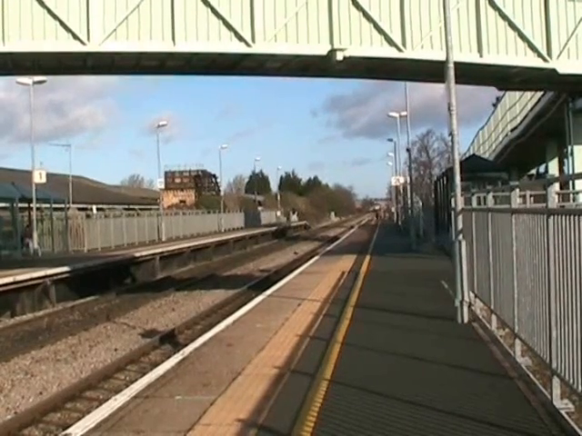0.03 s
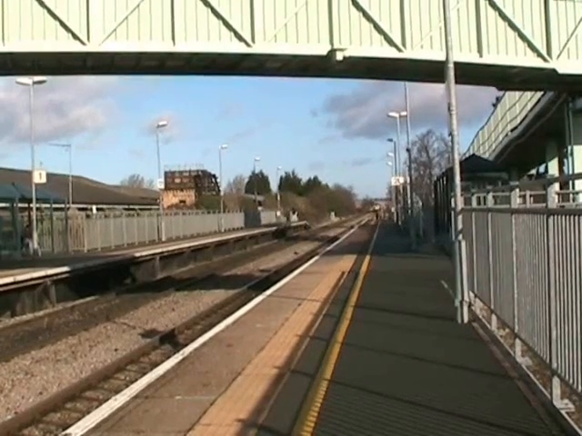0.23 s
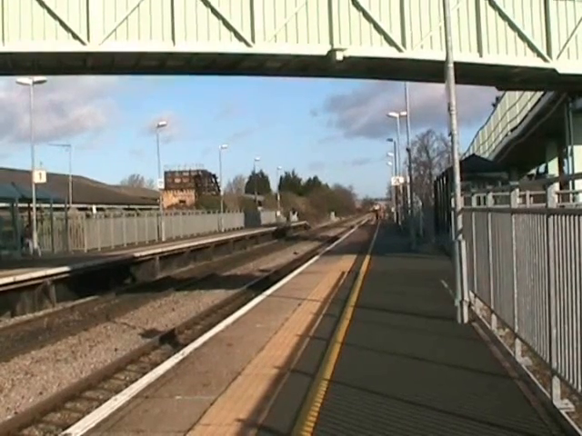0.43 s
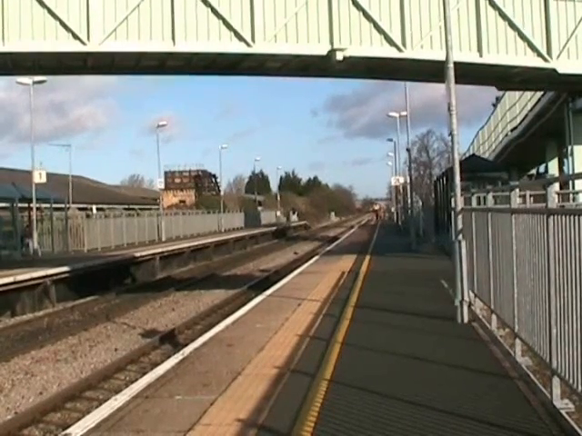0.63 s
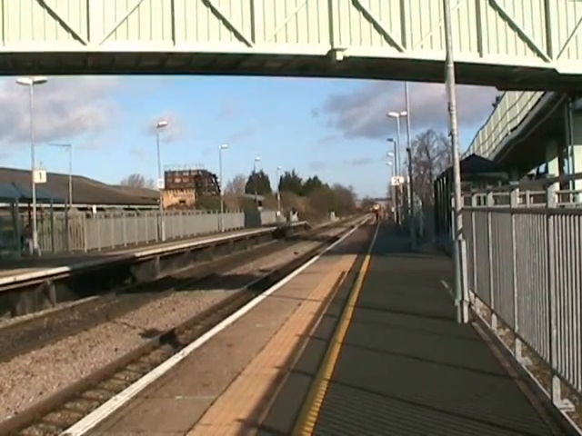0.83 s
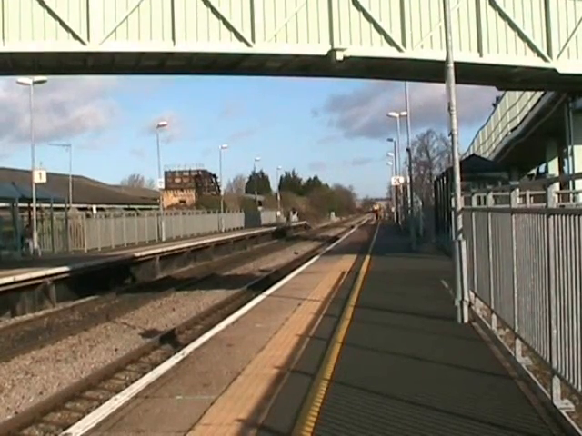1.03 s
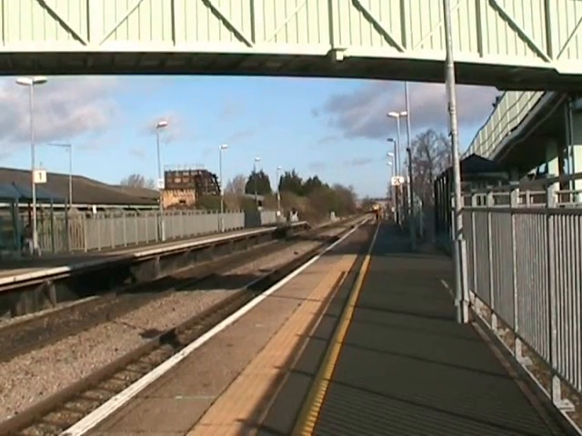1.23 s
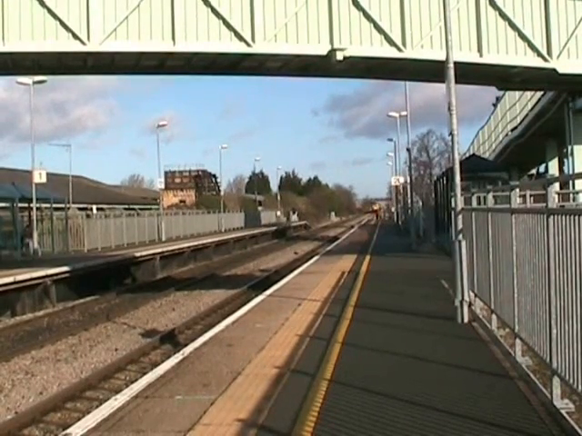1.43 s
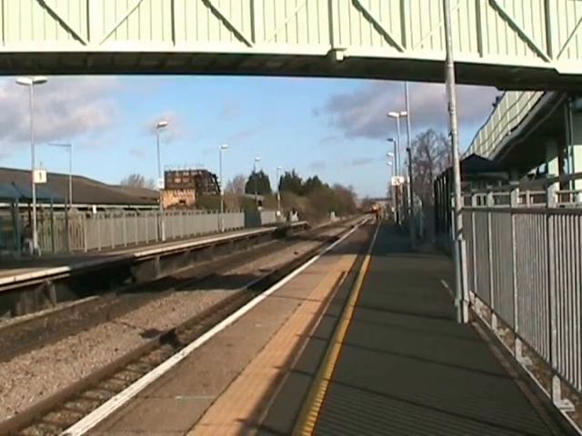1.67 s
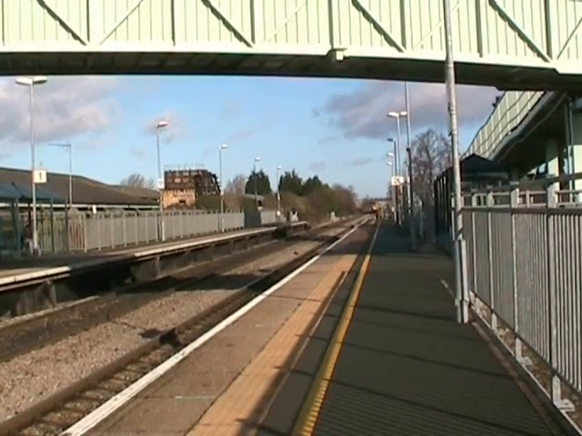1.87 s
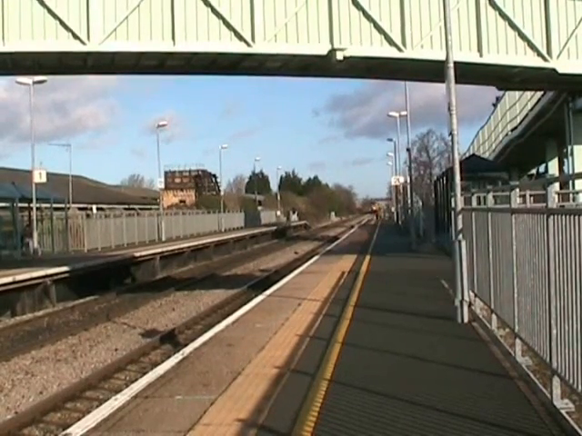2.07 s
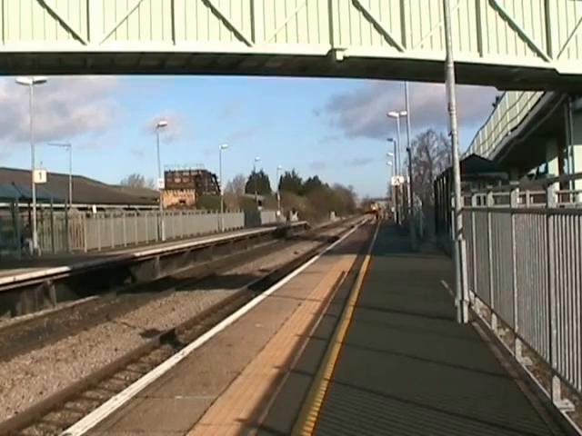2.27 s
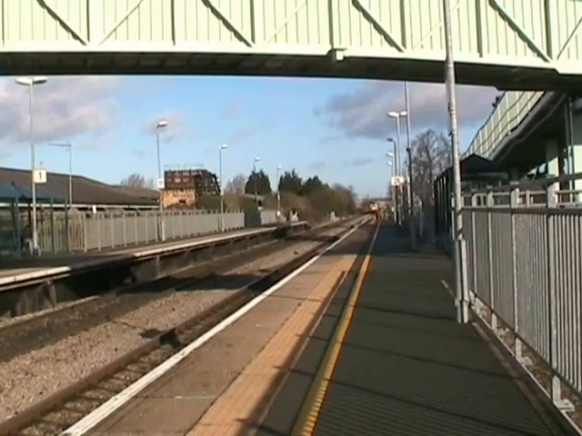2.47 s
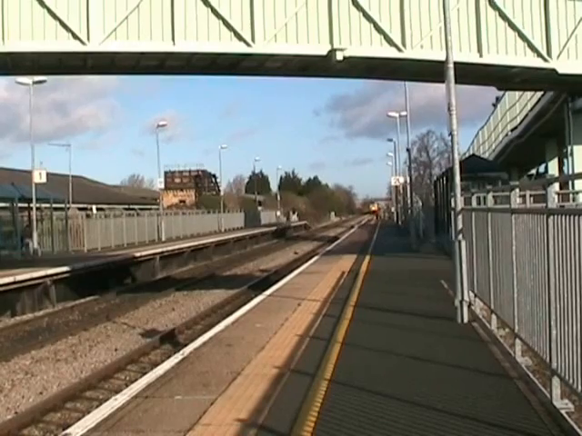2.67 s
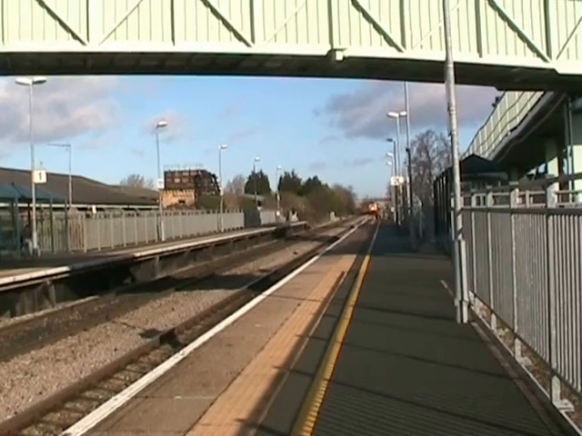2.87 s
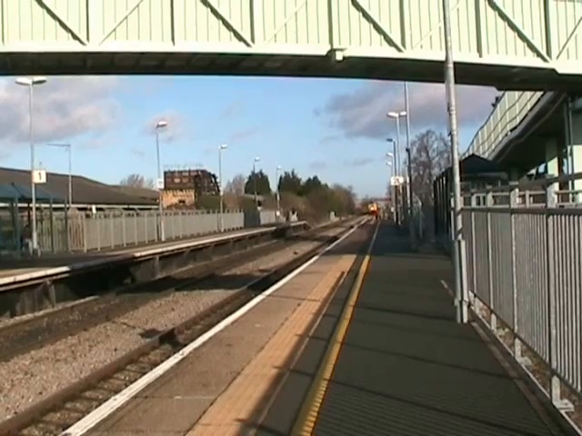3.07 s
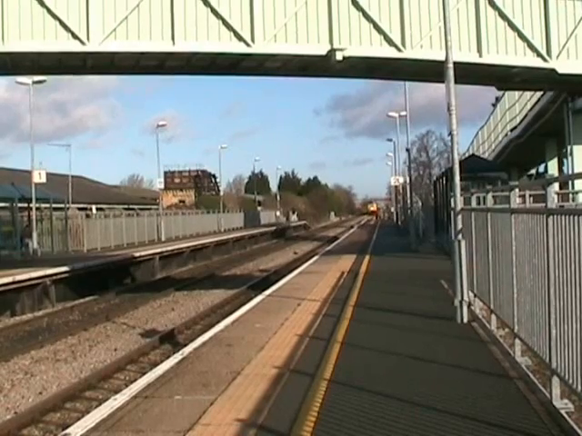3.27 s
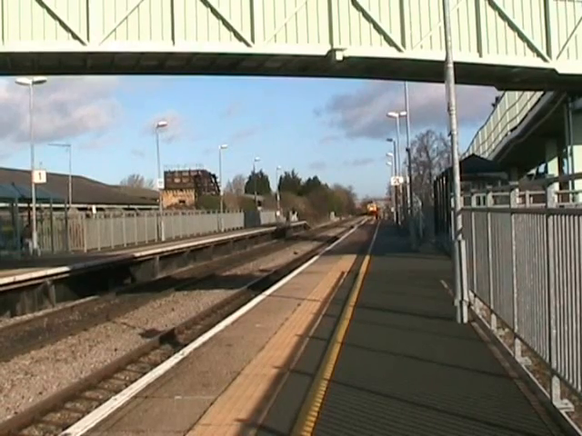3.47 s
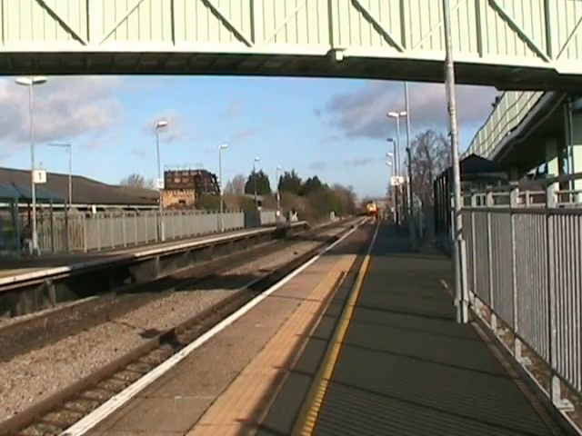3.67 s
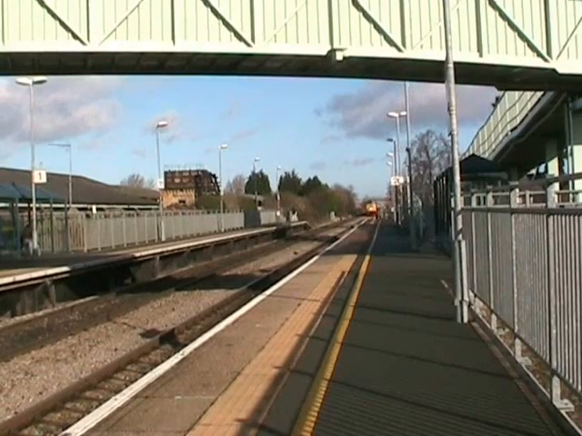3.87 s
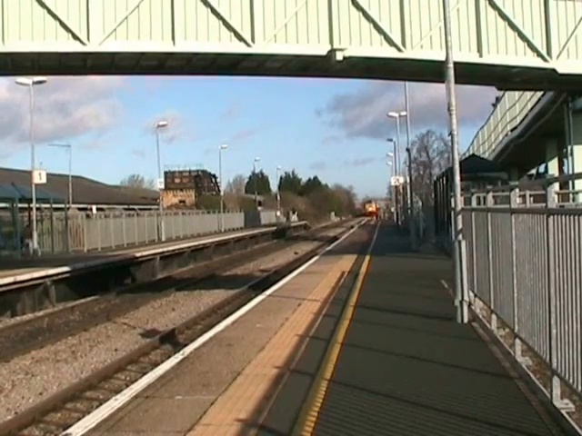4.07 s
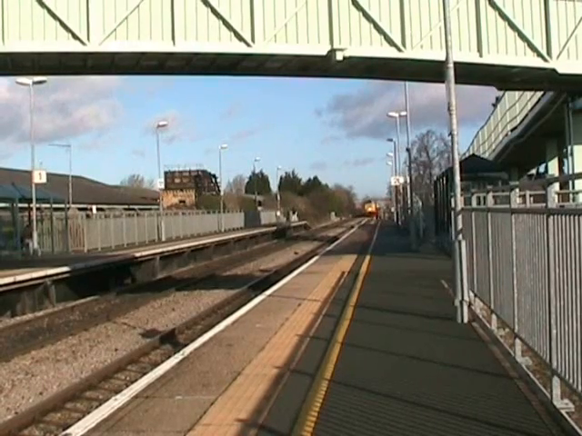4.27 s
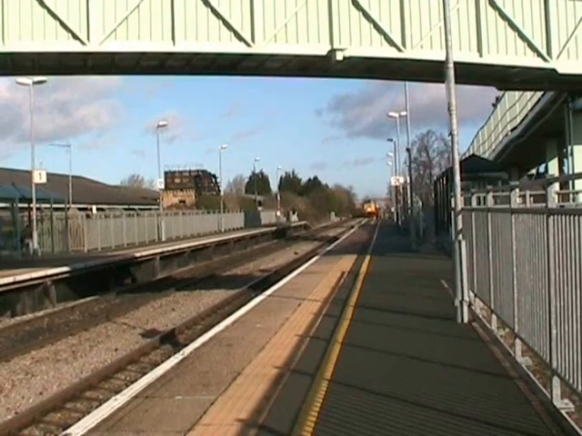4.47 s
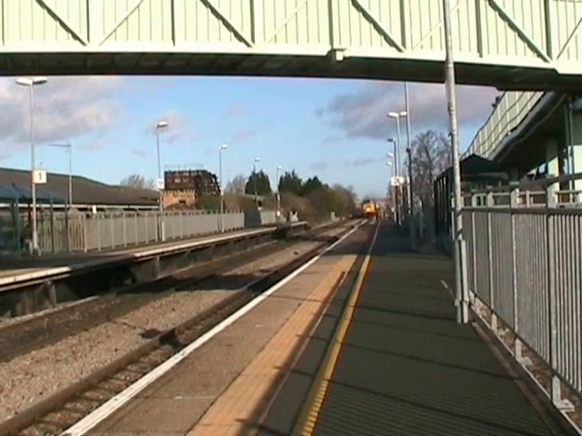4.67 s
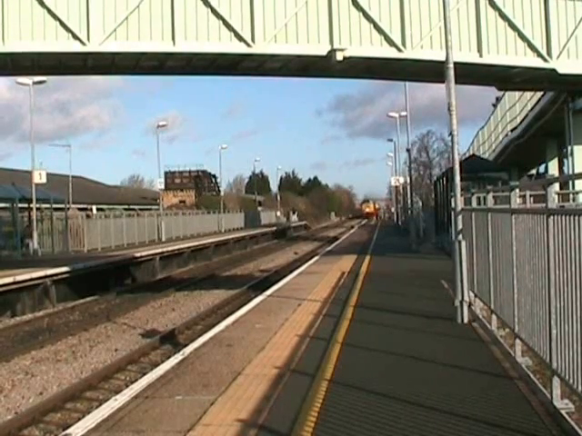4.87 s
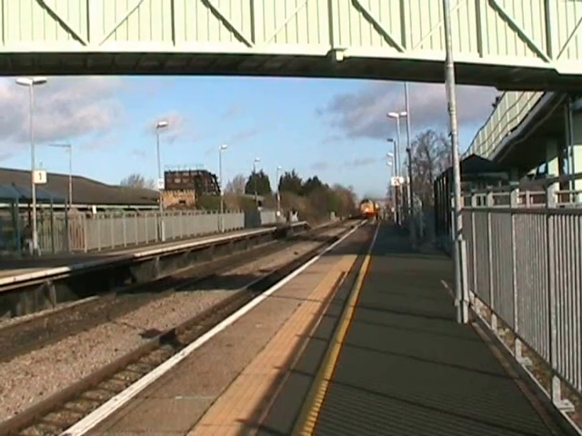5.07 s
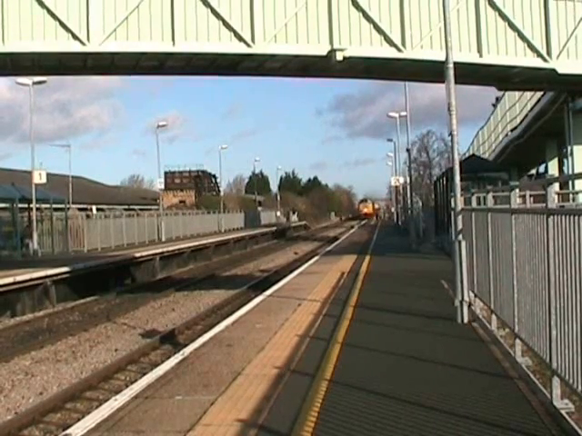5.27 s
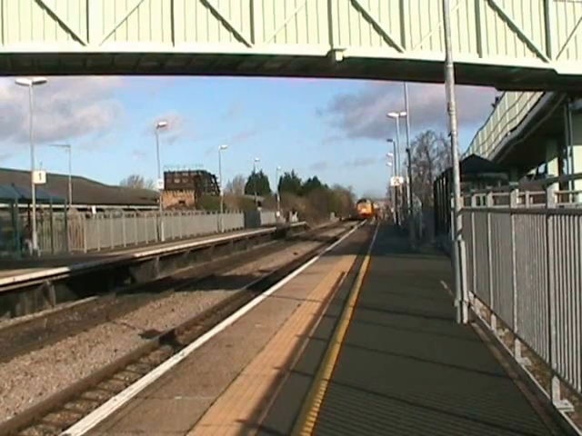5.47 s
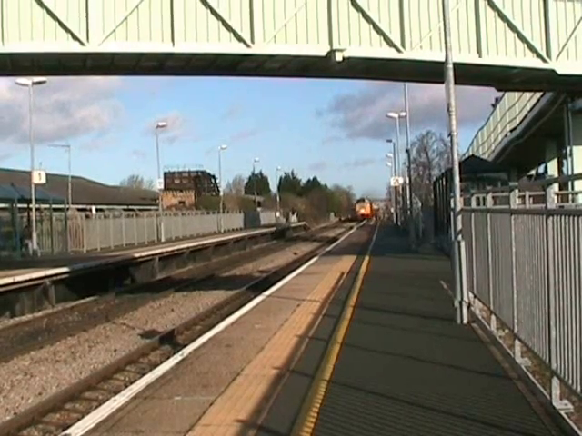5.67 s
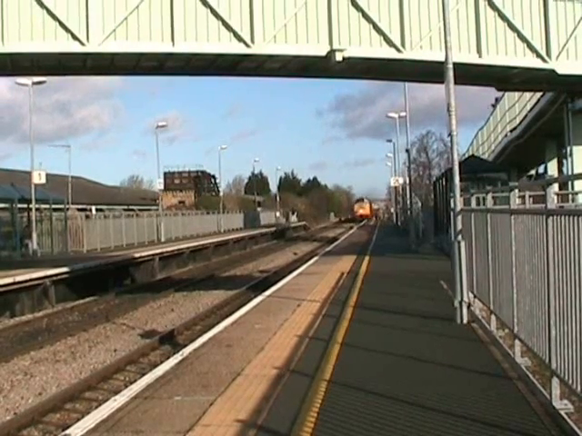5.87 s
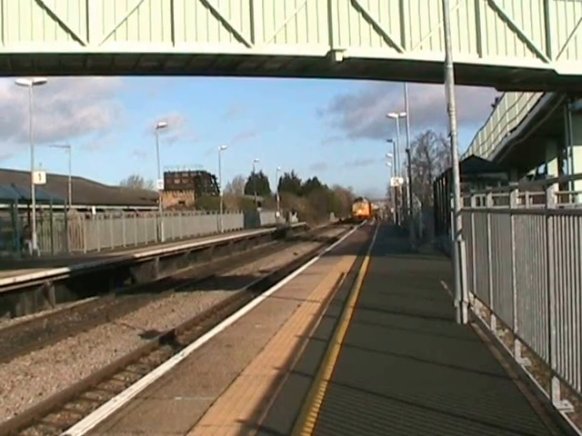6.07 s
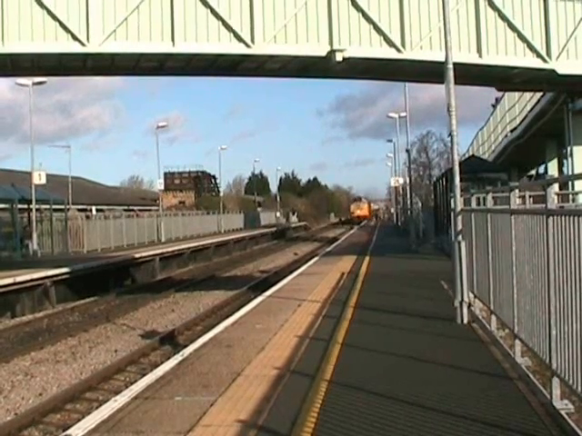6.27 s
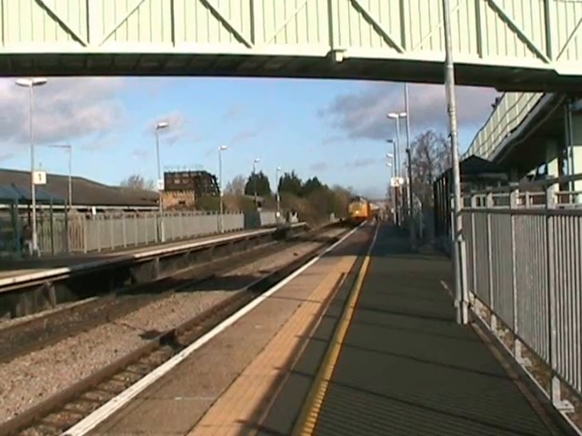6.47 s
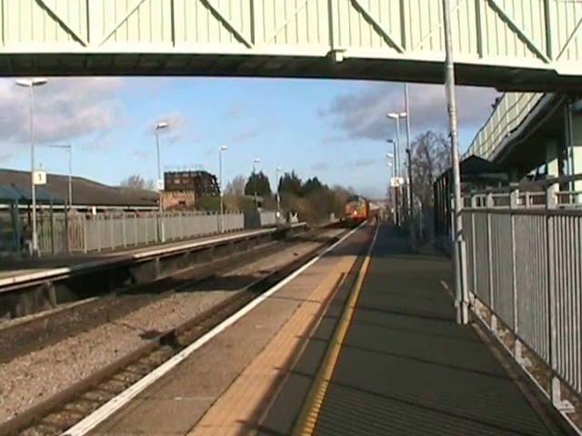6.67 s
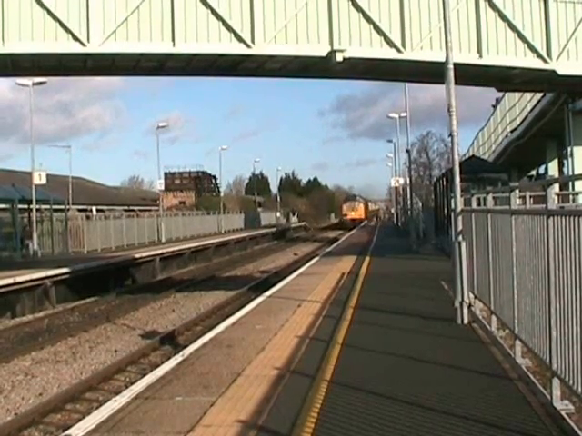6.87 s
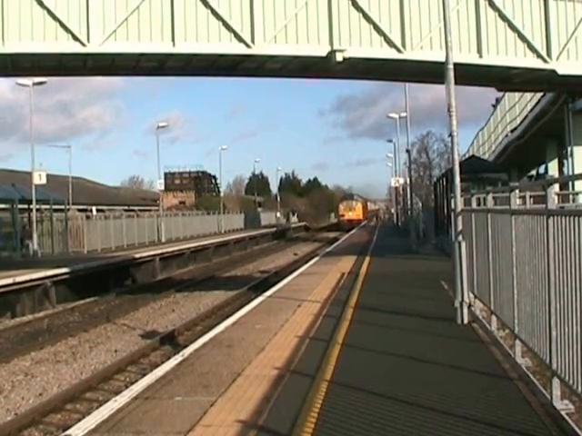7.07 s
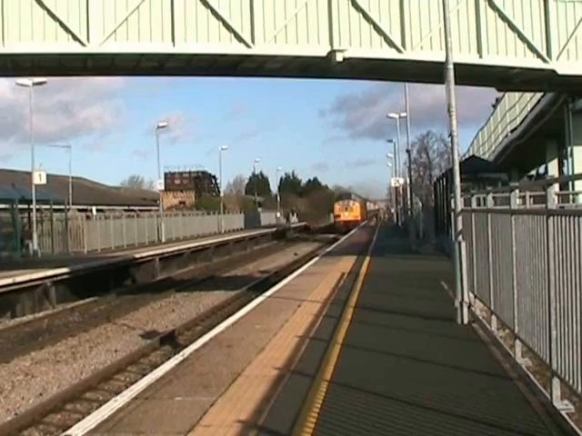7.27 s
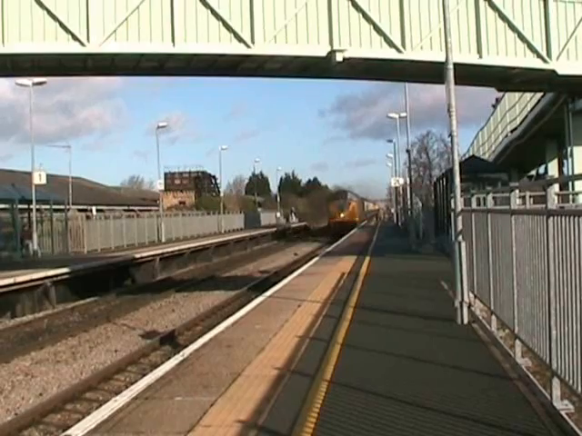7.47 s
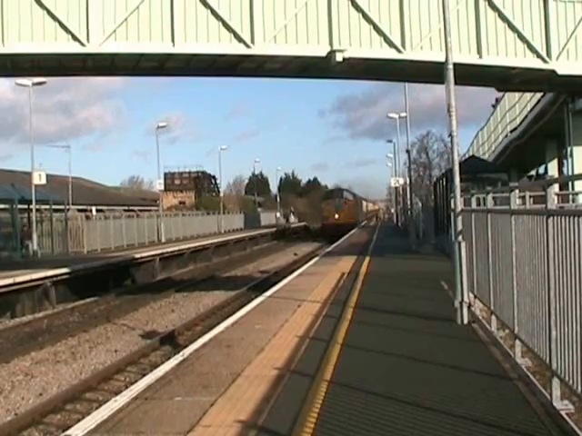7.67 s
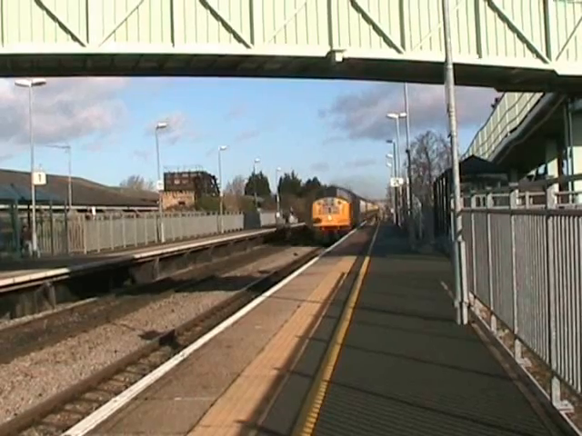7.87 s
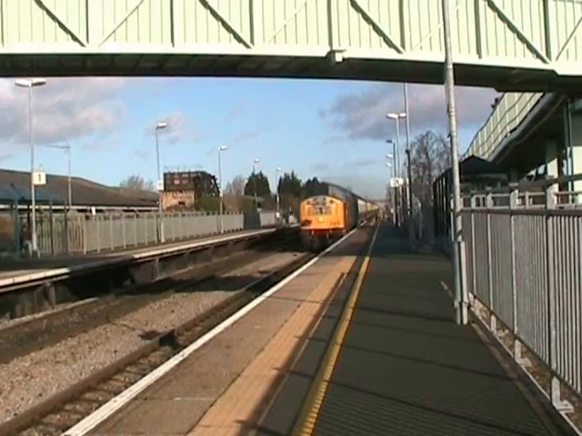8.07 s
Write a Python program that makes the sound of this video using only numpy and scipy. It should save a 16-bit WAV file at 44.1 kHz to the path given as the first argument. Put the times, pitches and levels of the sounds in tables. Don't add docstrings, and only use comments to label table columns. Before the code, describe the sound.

Over a faint open-air town wash, a throbbing diesel engine grows louder and brighter for eight seconds, still approaching as it cuts off.

```python
import sys
import numpy as np
from scipy import signal
from scipy.fft import rfft, irfft, next_fast_len
from scipy.io import wavfile
from scipy.ndimage import uniform_filter1d

SR = 44100
rng = np.random.default_rng(int(sys.argv[2]) if len(sys.argv) > 2 else 0)


def field_ratio(decibels):
    return 10 ** (np.asarray(decibels, dtype=float) / 20)


def unload_wav(signal):
    wavfile.write(
        sys.argv[1],
        SR,
        np.round(np.clip(np.atleast_2d(signal).T, -1, 1) * 32767).astype(np.int16),
    )


N = 357651
T = np.arange(N) / SR
HZ = np.fft.rfftfreq(1024, 1 / SR)
FRAME_S = np.arange(N // 256 + 5) * 256 / SR
CYCLE_HZ = 8.323
DRUM_HZ = 300

# (share of cycle [1], strength [dB])
FIRING = [(0.011, -3.8), (0.116, -3.3), (0.171, 2.3), (0.199, 6.0), (0.229, 5.9), (0.307, -0.0),
          (0.362, -1.6), (0.402, -4.3), (0.468, 1.7), (0.56, 0.8), (0.672, -1.1), (0.723, -4.6),
          (0.757, 1.0), (0.805, -7.9), (0.858, 4.9), (0.909, 4.0)]
# (multiple of cycle [1], far level [dB rms], near level [dB rms])
EXHAUST_ORDERS = [(5, -49, -45), (7, -43, -44), (8, -45, -37), (11, -33, -26), (12, -48, -41),
                  (13, -45, -32), (15, -56, -43), (16, -49, -29), (18, -55, -29), (19, -55, -39),
                  (20, -48, -24), (21, -50, -30), (22, -49, -30), (23, -61, -37), (24, -53, -35),
                  (25, -52, -32), (26, -57, -37), (27, -50, -31), (28, -58, -36), (29, -69, -42),
                  (30, -59, -39), (31, -52, -35), (36, -49, -35), (38, -49, -38), (39, -54, -37),
                  (40, -57, -42), (41, -50, -37), (44, -52, -40)]
# (time [s], level [dB])
ROAR_LEVEL = [(0, -52), (.7, -42.5), (2, -35.5), (2.5, -36.5), (3.2, -31.5), (3.7, -30.5), (4.4, -29.5),
              (5.6, -23.5), (6, -22), (6.8, -17.5), (8.11, -16.5)]
# (frequency [Hz], level [dB per Hz])
ROAR_FAR = [(30, -12), (70, -9), (150, -4), (250, -4.5), (285, -36.5), (350, -3), (480, -2), (700, -5.5),
            (900, -13.5), (1500, -10.5), (2000, -13.5), (2700, -23.5), (4000, -30.5), (12000, -72)]
# (frequency [Hz], level [dB per Hz])
ROAR_NEAR = [(30, -26), (70, -13), (150, -8.5), (255, -3), (285, -7), (450, -3.5), (650, -4), (880, -13.5),
             (1050, -9.5), (1550, -11), (2400, -22), (5200, -34), (9000, -43), (11500, -40.5), (12800, -51)]
# (frequency [Hz], correlation [1])
ROAR_LIKENESS = [(40, 1), (100, 0.4), (300, 0.93), (1000, 0.93), (2500, 0.96), (5000, 0.69), (8000, 0.24),
                 (12000, 0.7)]
# (time [s], length [s], deep-order level [dB], upper-order
# tilt [dB per octave])
SCREENS = [
    (1.3, .3, 9, -3),
    (1.7, 0.24, -3, 7),
    (2.1, 0.21, 2.5, 2),
    (2.6, 0.45, -0.2, -1),
    (3, 0.42, -1.5, -10),
    (4, 0.43, -0.5, 5),
    (5.3, .5, 0.5, 3.5),
    (6.15, 0.39, -4.5, -1),
    (7.5, 0.38, 2.5, -1),
    (8.15, 0.67, -3.5, -8),
]
# (frequency [Hz], level [dB per Hz])
TOWN_COLOUR = [(25, -8), (60, -6.5), (120, -2), (250, -8), (640, -8.5), (1000, -10.5), (1500, -15.5),
               (2400, -23), (4000, -39.5), (6000, -39.5), (8000, -79), (12500, -64)]
# (frequency [Hz], correlation [1])
TOWN_LIKENESS = [(40, 0.42), (300, 0.57), (1000, 0.71), (2500, 0.6), (5000, 0.057), (12000, 0.15)]
# (time [s], length [s], level over the breeze [dB])
GUSTS = [
    (4.1, 0.41, 14),
    (6.2, .8, 18),
    (7.5, 0.74, 6),
]
# (time [s], length [s], centre [Hz], width [Hz], level [dB])
HISSES = [
    (.05, 0.63, 6630, 2500, -57),
    (0.402, 0.17, 4500, 3500, -51),
    (1.592, 0.6, 4470, 900, -52),
    (1.917, 0.52, 7770, 504, -58),
    (2.87, 0.19, 5450, 800, -53),
    (3.1, 1.0, 3390, 60, -53.5),
    (3.976, 0.072, 9000, 2950, -55),
    (.88, 0.087, 9000, 3000, -72),
    (6.817, 0.066, 10000, 3000, -67),
]
# (frequency [Hz], level [dB rms])
WHINES = [(5233, -75), (5400, -68.5), (6137, -76), (10589, -79), (11106, -78), (12306, -78)]
# (frequency [Hz], level [dB per Hz])
RASP_COLOUR = [(2000, -33), (3000, -7), (5500, -2.5), (6800, -8.5), (8000, -18), (9200, -5), (10200, -3),
               (11000, -1), (12500, -13)]
# (time [s], ring peak [dB], ring pitch [Hz], crackle level [dB])
TICKS = [(0.426, -31, 1710, -27), (0.4988, -30, 2200, -32), (.504, -46, 5000, -38),
         (2.65, -21.5, 2770, -24), (2.656, -16.5, 2180, -27), (2.659, -40, 6700, -30.5),
         (2.6651, -16.5, 2300, -33), (2.96, -38, 5150, -45), (3.054, -33, 3900, -35),
         (3.076, -20, 2070, -34), (3.079, -29, 3900, -34)]
# (frequency [Hz], lead of the left [rad])
PORT_LEAD = [(40, .1), (260, .3), (2200, 0), (4800, .1), (8100, .2), (8900, .5), (9300, 1.9), (9750, 2.9),
             (12700, 3.14)]
# (frequency [Hz], left minus right [dB])
PORT_TILT = [(25, -8), (60, -21), (100, -10), (160, -5), (260, -2), (420, -1), (900, -.5), (3000, 0),
             (12500, -1)]


def exhaust():
    place, puff_db = np.transpose(FIRING)
    turns = CYCLE_HZ * T
    near = nearness()
    shadow_db = -9 / (1 + np.exp((FRAME_S - 1.82) / 0.06))
    deep_db = shadow_db + sum(db * bump(s, length) for s, length, db, _ in SCREENS)
    tilt_db = sum(tilt * bump(s, length) for s, length, _, tilt in SCREENS)
    out = np.zeros(N)
    for order, far_db, near_db in EXHAUST_ORDERS:
        start = np.angle(np.sum(field_ratio(puff_db) * np.exp(-2j * np.pi * order * place)))
        screen_db = deep_db if order < 12 else tilt_db * np.log2(order / 20)
        level_db = far_db + (near_db - far_db) * near + screen_db + 1.1 * sway(2.5)
        phase = 2 * np.pi * order * turns + start + 0.1 * drift(1.5)
        out += np.sqrt(2) * stretch(field_ratio(level_db)) * np.cos(phase)
    return out


def roar():
    near = np.clip(nearness(), 0, 1)
    far_db = read(ROAR_FAR, HZ)[:, None]
    near_db = read(ROAR_NEAR, HZ)[:, None]
    octaves = np.log2(np.maximum(HZ / 6100, 1))
    close_db = 12 * np.outer(octaves, np.maximum(FRAME_S - 7, 0))
    colour_db = far_db + (near_db - far_db) * near + close_db
    air = noise(colour_db, read(ROAR_LIKENESS, HZ), patchy_db=0.96)
    share = CYCLE_HZ * T % 1
    puffs = sum(field_ratio(db) * np.exp(-((share - place) % 1) / 0.0099) for place, db in FIRING)
    return air * evened(1 + 0.19 * puffs) * field_ratio(roar_level_db(T) + 0.5 * drift(6))


def blower():
    since = T - 6.72
    level_db = -30 + np.minimum(6 * since, -2 * since)
    return field_ratio(level_db + 2 * drift(3)) * tone(261.3 + 0.51 * drift(2.2))


def road_engine():
    since = T - 0.6
    hz = 82.4 + 6.0 * since + 2.03 * since ** 2
    rise_db = -38 * np.maximum(2.4 - T, 0)
    lift_db = -84 * np.maximum(T - 4.0, 0)
    gap_db = -22 * stretch(bump(3, 0.17))
    return field_ratio(-39.5 + rise_db + lift_db + gap_db + 1.0 * drift(4.6)) * tone(hz)


def idling_machine():
    swing_db = -10 * T * np.sin(np.pi * T / 0.95) ** 2
    low_db = -42 + 0.5 * T + swing_db
    high_db = -40.5 - 4.5 * T
    out = np.zeros(N)
    for hz, level_db in ((70.7, low_db), (228.5, high_db)):
        out += field_ratio(level_db + 0.7 * drift(5.7)) * tone(hz + 0.54 * drift(3.63))
    return out


def town():
    return field_ratio(-34.5) * noise(read(TOWN_COLOUR, HZ)[:, None], read(TOWN_LIKENESS, HZ), patchy_db=1.06)


def wind():
    level_db = -52 + sum(db * bump(s, length) for s, length, db in GUSTS)
    colour_db = -24.0 * np.log2(1 + HZ / 45)[:, None]
    return stretch(field_ratio(level_db)) * noise(colour_db, 0 * HZ, patchy_db=-3.0)


def hisses():
    out = np.zeros((2, N))
    for s, length, hz, width_hz, db in HISSES:
        count = round(length * SR)
        swell = np.sin(np.pi * np.arange(count) / count)
        out[:, round(s * SR):][:, :count] += field_ratio(db) * swell * fuzz(hz, width_hz, count)
    return out


def motor():
    lines = list(WHINES)
    for k in range(9, 43):
        hz = k * DRUM_HZ
        lines.append((hz, min(read(RASP_COLOUR, hz), -4) - 75 + 3 * rng.standard_normal()))
    whine = np.zeros(N)
    for hz, db in lines:
        level = stretch(field_ratio(db + 2.5 * sway(8)))
        whine += 1.6 * level * np.sin(2 * np.pi * (hz * T + rng.random()))
    rasp = noise(read(RASP_COLOUR, HZ)[:, None], 0.35 + 0 * HZ, patchy_db=1.5)
    pulses = 1 + 0.2 * np.cos(2 * np.pi * DRUM_HZ * T)
    return whine + field_ratio(-51.5) * rasp * pulses


def ticks():
    out, t = np.zeros(N), np.arange(1500) / SR
    for s, db, hz, crackle_db in TICKS:
        band = signal.butter(2, [1100, min(1.4 * hz, 10800)], "bandpass", fs=SR)
        decay = np.exp(-t / 0.0026) + 0.37 * np.exp(-t / 0.036)
        crackle = signal.lfilter(*band, rng.standard_normal(len(t))) * decay
        ring = np.sin(2 * np.pi * hz * t) * np.exp(-t / 0.001)
        out[round(s * SR):][:len(t)] += field_ratio(db) * ring + field_ratio(crackle_db) * crackle
    return out


def roar_level_db(t):
    s, db = np.transpose(ROAR_LEVEL)
    return np.interp(t, s, db)


def nearness():
    far_db, near_db = -30.5, -19
    return np.clip((roar_level_db(FRAME_S) - far_db) / (near_db - far_db), -0.5, 1.07)


def noise(colour_db, same, patchy_db):
    shape = (len(HZ), len(FRAME_S))
    a, b, c, d, patches = rng.standard_normal((5, *shape))
    patches = uniform_filter1d(patches, size=12, axis=0)
    patches = evened(uniform_filter1d(patches, size=20, axis=1))
    same = np.clip(same, -1, 1)[:, None]
    left = a + 1j * b
    right = same * left + np.sqrt(1 - same ** 2) * (c + 1j * d)
    gain = field_ratio(colour_db) * np.ones(shape)
    gain = gain / np.linalg.norm(gain, axis=0) * field_ratio(patchy_db * patches)
    z = np.array([left, right]) * gain
    return evened(signal.istft(z, nperseg=1024, noverlap=768)[1][:, :N])


def fuzz(hz, width_hz, count):
    r = np.exp(-np.pi * width_hz / SR)
    grain = rng.standard_normal((2, count)) + 1j * rng.standard_normal((2, count))
    slow = signal.lfilter([1], [1, -2 * r, r * r], grain)
    return evened((slow * np.exp(2j * np.pi * hz * np.arange(count) / SR)).real)


def tone(hz):
    return np.sqrt(2) * np.sin(2 * np.pi * np.cumsum(hz * np.ones(N)) / SR)


def sway(rate_hz):
    rates = rate_hz * np.geomspace(0.1, 1, num=12)
    return evened(sum(np.sin(2 * np.pi * (f * FRAME_S + rng.random())) / np.sqrt(f) for f in rates))


def drift(rate_hz):
    return stretch(sway(rate_hz))


def bump(s, length):
    return np.exp(-((FRAME_S - s) / length) ** 2)


def stretch(frames):
    return np.interp(T, FRAME_S, frames)


def read(points, hz):
    f, value = np.transpose(points)
    return np.interp(np.log(hz + 1), np.log(f + 1), value)


def evened(x):
    return x / np.sqrt(np.mean(x ** 2) + 1e-20)


def scene():
    locomotive = exhaust() + roar() + blower()
    background = road_engine() + idling_machine() + town() + wind() + hisses()
    return locomotive + background + motor() + ticks()


def top_cut(x):
    return signal.sosfilt(signal.butter(12, 13140, fs=SR, output="sos"), x)


def record(dry):
    size = next_fast_len(N)
    hz = np.fft.rfftfreq(size, 1 / SR)
    ratio = field_ratio(read(PORT_TILT, hz)) * np.exp(1j * read(PORT_LEAD, hz))
    ports = np.array([ratio, np.ones(len(hz))]) * 2 / (1 + abs(ratio))
    ports /= np.sqrt(1 + (34 / (hz + 1)) ** 6)
    mix = irfft(rfft(dry, size) * ports, size)[:, :N]
    mix = mix / (1 + abs(mix / 1.1) ** 6) ** (1 / 6)
    return top_cut(mix)


dry = scene()
out = record(dry)
unload_wav(out)
```